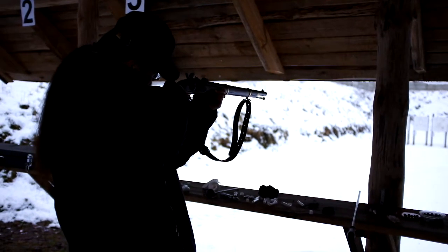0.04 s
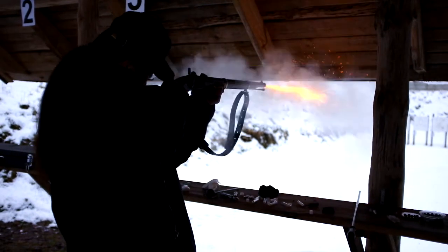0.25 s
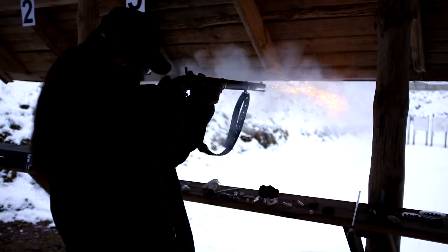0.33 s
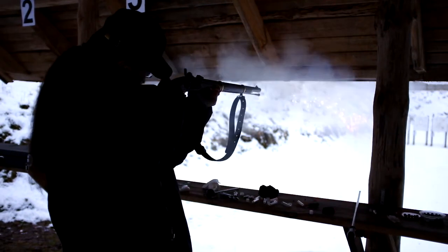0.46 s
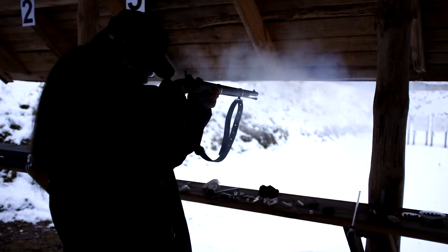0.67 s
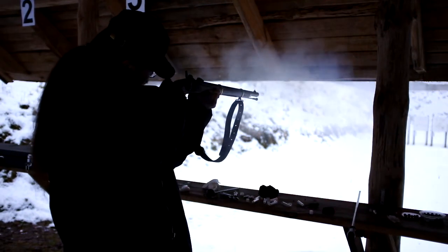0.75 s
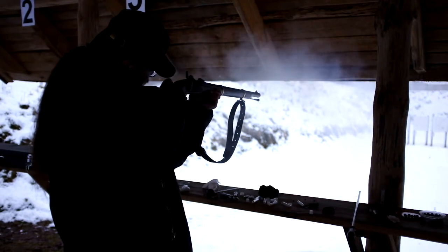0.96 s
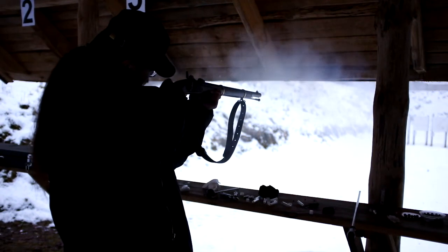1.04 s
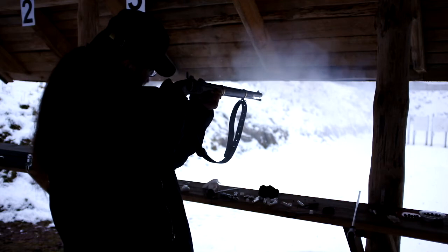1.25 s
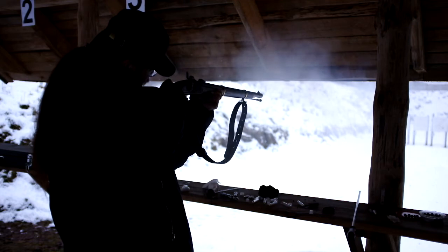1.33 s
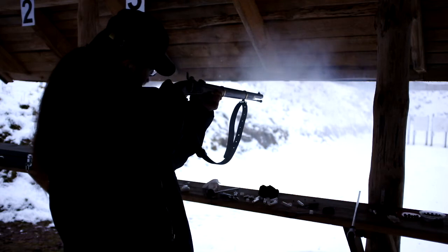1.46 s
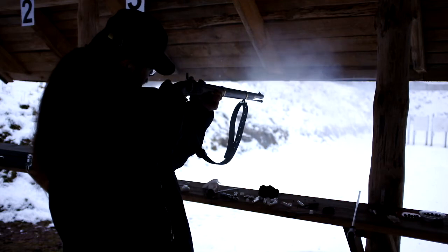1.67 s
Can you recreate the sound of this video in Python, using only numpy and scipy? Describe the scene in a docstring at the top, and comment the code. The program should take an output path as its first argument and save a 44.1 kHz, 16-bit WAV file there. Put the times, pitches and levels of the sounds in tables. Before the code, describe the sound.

At an outdoor shooting range, a long gun fires once, close and slightly overloading the microphone. A dense roll of echoes follows, with a few knocks and faint debris ticks, dying away in a low rumble.

```python
"""A brief spit of priming, then the blast of a black-powder long gun at a snowy outdoor range.
The blast excites the resonances of the timber shelter overhead and overloads the microphone.
Reflections from banks and trees return as a dense roll with a few distinct slaps and thuds.
Bits of debris tick down, and a far rumble from the woods fades toward the hush of still air."""
import sys
import numpy as np
from scipy import signal
from scipy.io import wavfile

SR = 44100
rng = np.random.default_rng(int(sys.argv[2]) if len(sys.argv) > 2 else 0)


def master(y):
    """Save y as 16-bit WAV."""
    cut = np.clip(np.atleast_2d(y).T, -1, 1)
    pcm = np.round(cut * 32767)  # scale
    wavfile.write(sys.argv[1], SR, pcm.astype(np.int16))


N = 74970
TIME = np.arange(N) / SR
SHOT_S = .2015


def from_db(db):
    """Amplitude grows tenfold for every 20 dB."""
    return 10 ** (np.asarray(db) / 20)


def rms_one(x):
    """Division by the rms gives a signal unit power."""
    return x / np.sqrt(np.mean(x ** 2) + 1e-20)


def at_hz(rows, hz):
    """A table's columns, interpolated at one point of a logarithmic frequency axis."""
    pitches, *columns = np.transpose(rows)
    return [np.interp(np.log(hz), np.log(pitches), column) for column in columns]


def since(start):
    """Seconds after an onset, zero before it."""
    return np.maximum(TIME - start, 0)


def fade(age, t60):
    """Exponential decay: the level falls 60 dB in t60 seconds."""
    return from_db(-60 * np.maximum(age, 0) / t60)


def swell(table, hz):
    """Growth and decay of a sound field: after the shot one band builds up, holds and dies away."""
    db, build, hold, t60 = at_hz(table, hz)
    age = since(SHOT_S)
    return from_db(db) * np.minimum(age / build, 1) ** .41 * fade(age - hold, t60)


def flicker(rate_hz):
    """Random modulation of unit rms, gliding from one value to the next."""
    steps = np.arange(N) * rate_hz / SR
    return rms_one(np.interp(steps, np.arange(4000), rng.standard_normal(4000)))


def hiss(low_hz, high_hz):
    """Band-limited noise of unit power."""
    bandpass = signal.butter(2, [low_hz, high_hz], "band", fs=SR, output="sos")
    return rms_one(signal.sosfilt(bandpass, rng.standard_normal(N)))


def banded_noise(gain_at, coherence_share):
    """Partly coherent stereo noise in half-octave bands; gain_at(hz) gives the rms per octave."""
    # Likeness of the two ears. Each row: frequency in Hz, correlation at a share of 1.
    coherence = [(60, 1), (250, 1), (500, 0.94), (1000, 0.85), (2000, 0.3), (4200, 0.033), (7000, 0.073),
                 (10500, .8), (15000, 0.72)]
    edges = 20 * 2 ** (np.arange(21) / 2)
    white = rng.standard_normal((2, 2, N + SR // 8))
    mid_side = np.zeros((2, N))
    for k, (low, high) in enumerate(zip(edges, edges[1:])):
        bandpass = signal.butter(3, [low, high], "band", fs=SR, output="sos")
        pair = signal.sosfilt(bandpass, white[k % 2])[:, -N:]
        hz = np.sqrt(low * high)
        alike = coherence_share * at_hz(coherence, hz)[0]
        mid_side += gain_at(hz) * rms_one(pair) * np.sqrt([[1 + alike], [1 - alike]])
    mid, side = mid_side / 2
    return np.array([mid + side, mid - side])


def wave_packet(start, hz, cycles):
    """A transient pressure wave whose envelope peaks after the given cycles and dies away."""
    turns = since(start) * hz
    return np.sin(2 * np.pi * turns) * (turns / cycles * np.exp(1 - turns / cycles)) ** 2


def blast():
    """Impulsive excitation: pressure fronts and treble arrive at once; bass builds under the roof."""
    # The blast in the shelter. Each row: frequency in Hz, level per octave in dB,
    # then build-up, hold and 60 dB decay times in seconds.
    spectrum = [(30.1, -33, .004, .02, 0.41), (60.5, -33, .02, .06, 0.17), (120, -18, 0.065, 0.073, 0.52),
                (250, -17, .05, 0.097, .36), (480, -8.5, 0.028, 0.074, 0.31), (700, -12.5, .02, 0.11, 0.24),
                (1000, -13.5, .015, 0.08, 0.34), (1991, -9, 0.0064, 0.071, 0.38),
                (4070, -11, .007, 0.054, 0.34), (9100, -7, .007, 0.012, 0.36),
                (15000, -11.5, .006, .01, 0.39)]
    # First waves of priming and muzzle. Each row: start in seconds, envelope peak in dB,
    # frequency in Hz, cycles to the peak.
    fronts = [(.197, -22.5, 38, .3), (.197, -15.5, 800, 0.86), (0.2037, -7, 330, .4),
              (0.204, -8, 1300, 0.45)]
    roar = banded_noise(lambda hz: swell(spectrum, hz), coherence_share=.92)
    roar *= from_db(.9 * flicker(rate_hz=220))
    return roar + sum(from_db(db) * wave_packet(start, hz, cycles) for start, db, hz, cycles in fronts)


def priming():
    """Rapid combustion: the priming spits broadband noise a few milliseconds before the main charge."""
    start = .1972
    return from_db(-22) * hiss(118.5, 10800) * (TIME > start) * fade(since(start), t60=.04)


def shelter():
    """Modal resonance: roof, posts and the air between them ring on after the blast."""
    # The shelter's modes. Each row: frequency in Hz, level in dB, 60 dB decay time in seconds.
    modes = [(102.2, -10, 0.61), (150, -22, .9), (211.1, -18, .7), (255.8, -16, 1.1), (333.4, -16, 0.47),
             (384.7, -14, 0.7), (472.8, -14.5, 0.33), (536, -13, .7), (813, -8, .5), (1462, -22.5, 0.83),
             (1570, -18.5, 0.455)]
    age, build_s = since(SHOT_S), .05
    rings = np.zeros((2, N))
    for hz, db, t60 in modes:
        phase = rng.random() + .06 * rng.standard_normal((2, 1))  # the ears are slightly out of step
        rings += from_db(db) * fade(age, t60) * np.sin(2 * np.pi * (hz * age + phase))
    return rings * np.minimum(age / build_s, 1)


def echoes():
    """Discrete reflection: single surfaces return a hollow knock and a crack, the banks deep thuds."""
    # Sharp echoes. Each row: arrival in seconds, envelope peak in dB, frequency in Hz, # gain of the crack in
    # dB relative to that peak, before the crack noise is halved.
    slaps = [(.3635, -15.5, 420, 3), (0.4641, -11.5, 330, -22), (0.5136, -10.5, 335, -2.5),
             (0.5416, -13, 420, -30), (0.576, -3, 450, -9.5), (.631, -15, 425, -28),
             (0.6449, -13, 510, -27), (.68, -22, 470, -7), (0.865, -26, 420, -24), (.909, -25.5, 455, -22),
             (1.115, -33, 440, -19)]
    # Deep echoes. Each row: arrival in seconds, envelope peak in dB, frequency in Hz, cycles to the peak.
    thuds = [(0.438, -22.5, 109, 2.8), (0.469, -21.5, 232, 4.8), (0.575, -23, 61.6, 2.4),
             (.58, -25.5, 206.2, 8.4), (0.686, -34, 204.6, 10.6), (0.726, -49, 58, 2),
             (1.087, -50.5, 64, 1.3)]
    crack_noise = hiss(1660, 4260) / 2
    knocks = np.zeros(N)
    for start, db, hz, crack_db in slaps:
        crack = from_db(crack_db) * crack_noise * (TIME > start) * fade(since(start), t60=.016)
        knocks += from_db(db) * (wave_packet(start, hz, cycles=1) + crack)
    return knocks + sum(from_db(db) * wave_packet(start, hz, cycles) for start, db, hz, cycles in thuds)


def open_range():
    """Reverberation: countless reflections merge into a lumpy roll from banks and a rumble from woods."""
    # The near and far reverberant fields. Each row: frequency in Hz, level per octave in dB,
    # then build-up, hold and 60 dB decay times in seconds.
    roll = [(30, -58, .3, 0.25, .9), (60, -45, .3, 0.54, 0.38), (120.5, -38, .25, 0.46, 0.39),
            (250, -25.5, .25, 0.34, 0.59), (450, -22.5, 0.37, 0.51, 1), (680, -26, .24, 0.29, 1.2),
            (1000, -29.5, 0.28, 0.47, 1.34), (1900, -30, 0.17, 0.5, 1.12), (3866, -35, .27, 0.36, 1.2),
            (9000, -47, .27, 0.5, 0.32), (15000, -65, .3, 0.52, 0.17)]
    rumble = [(30, -66.5, .4, 0.34, 2.8), (60, -59, .4, 0.36, 3), (120, -53.5, .4, 0.68, 2.6),
              (250, -50.5, .4, 0.27, 4.5), (470, -37, 0.44, 0.51, 4.1), (680, -40, .4, 0.43, 3),
              (950, -44.5, .4, 0.26, 5.7), (2000, -44.5, .4, 0.26, 4.5), (3964, -59.5, .4, 0.41, 1.8),
              (12000, -84, .4, .55, 1.6)]
    field = banded_noise(lambda hz: np.hypot(swell(roll, hz), swell(rumble, hz)), coherence_share=.98)
    return field * from_db(1.2 * flicker(rate_hz=180))


def debris():
    """Impact noise: small hard bits land close by with dry, quickly damped ticks."""
    # The impacts. Each row: start in seconds, gain in dB, centre frequency in Hz,
    # fall to either side in dB per octave (negative rises), 60 dB decay time in seconds.
    impacts = [(0.363, -27.5, 4000, -3, 0.024), (.398, -12.5, 7000, 7, 0.0063),
               (0.5896, -10, 10500, 5.5, 0.0031), (0.591, -27, 7900, 5, 0.016),
               (0.8248, -33.5, 6950, 1.5, 0.0028), (1.2016, -35.5, 9800, 28, 0.016)]
    # The colour all ticks share. Each row: lower and upper band edge in Hz, gain in dB.
    colour = [(3400, 5400, -4.5), (5660, 9300, -16), (9070, 11600, -4.5), (11200, 13700, -13)]
    bands = [(np.sqrt(low * high), from_db(db) * hiss(low, high)) for low, high, db in colour]
    ticks = np.zeros(N)
    for start, db, centre_hz, fall, t60 in impacts:
        noise = sum(from_db(db - fall * abs(np.log2(hz / centre_hz))) * band for hz, band in bands)
        ticks += noise * (TIME > start) * fade(since(start), t60)
    return ticks


def grit():
    """Superposition: the tiny impacts of fine grit blend into a thin, grainy hiss."""
    # Showers of grit. Each row: midpoint in seconds, half length in seconds, level in dB.
    showers = [(0.483, .045, -48.5), (0.55, 0.029, -39), (1.26, .06, -68)]
    envelope = sum(from_db(db) * np.exp(-((TIME - middle) / half) ** 2) for middle, half, db in showers)
    patter = hiss(9373, 12360) * from_db(3 * flicker(rate_hz=1200))
    return envelope * rms_one(patter)


def still_air():
    """Ambient noise: a faint, stationary hush lies under everything."""
    # The background spectrum. Each row: frequency in Hz, level per octave in dB.
    spectrum = [(30, -70), (60, -72), (97, -61), (140, -68.5), (250, -65), (500, -59), (1000, -61.5),
                (2000, -60.5), (4000, -65.5), (9000, -65.5), (15000, -66.5)]
    return banded_noise(lambda hz: from_db(at_hz(spectrum, hz)[0]), coherence_share=.55)


def scene():
    """Linear superposition: the pressures of all sources add at the microphone."""
    return still_air() + priming() + blast() + shelter() + open_range() + echoes() + debris() + grit()


def record(dry):
    """Saturation: the microphone rounds off the blast's peaks; low-passes soften, then cut the top."""
    clip_level = .97
    overloaded = dry / (1 + (dry / clip_level) ** 4) ** (1 / 4)
    softened = signal.sosfilt(signal.butter(2, 14000, fs=SR, output="sos"), overloaded)
    return signal.sosfilt(signal.cheby2(16, 70, 16400, fs=SR, output="sos"), softened)


dry = scene()
out = record(dry)
master(out)
```